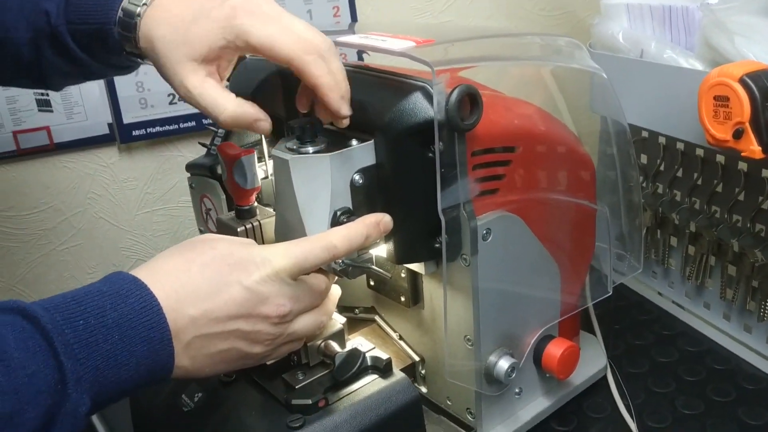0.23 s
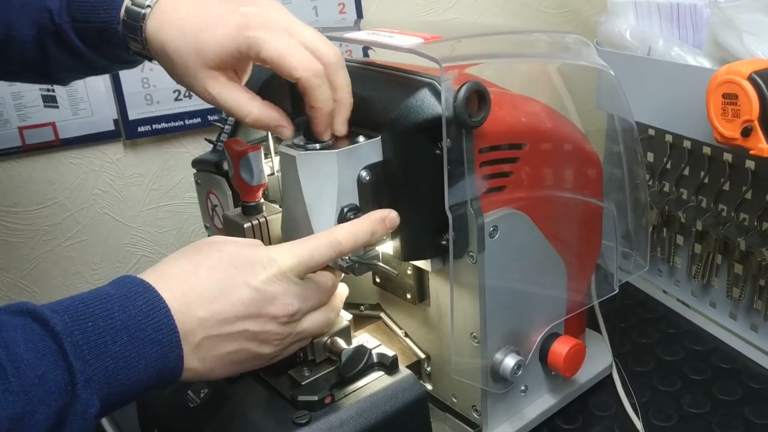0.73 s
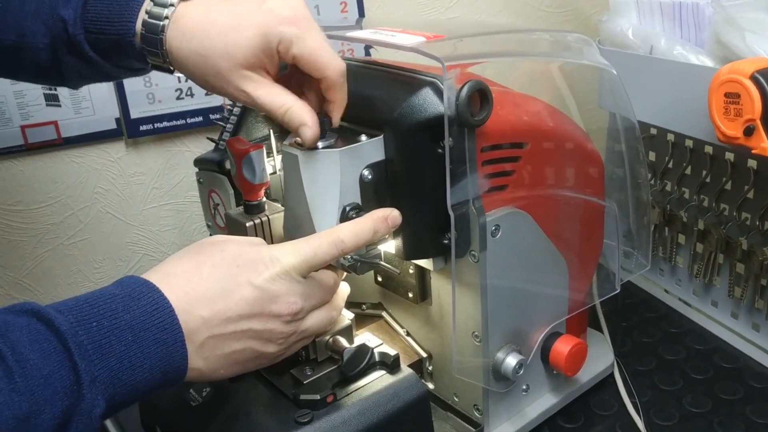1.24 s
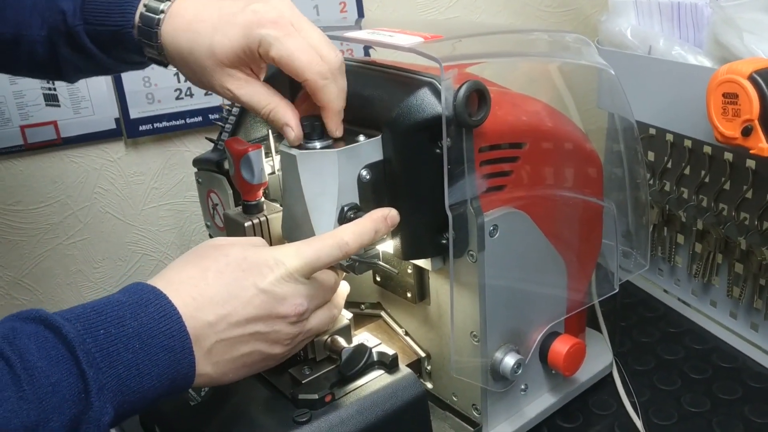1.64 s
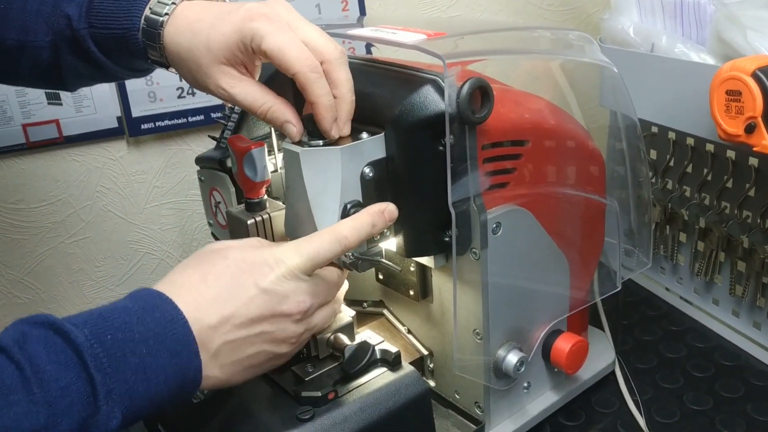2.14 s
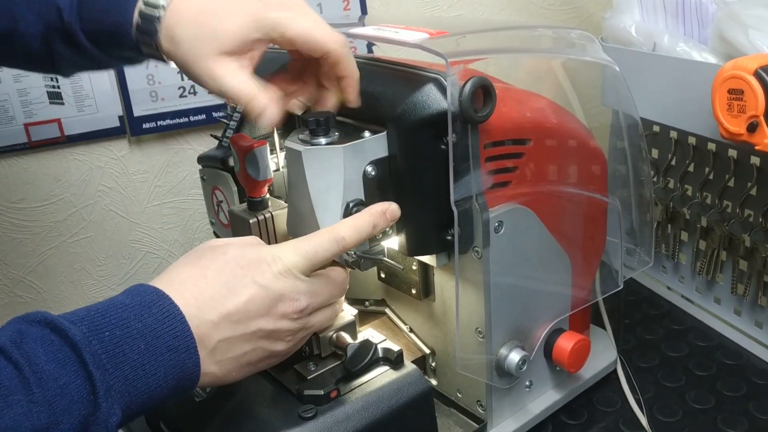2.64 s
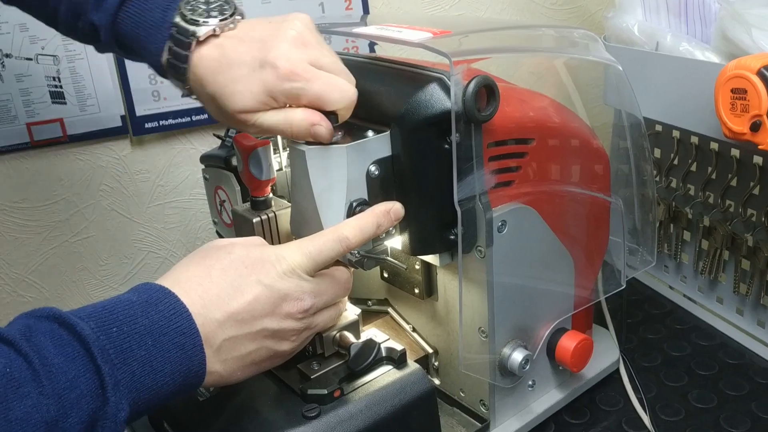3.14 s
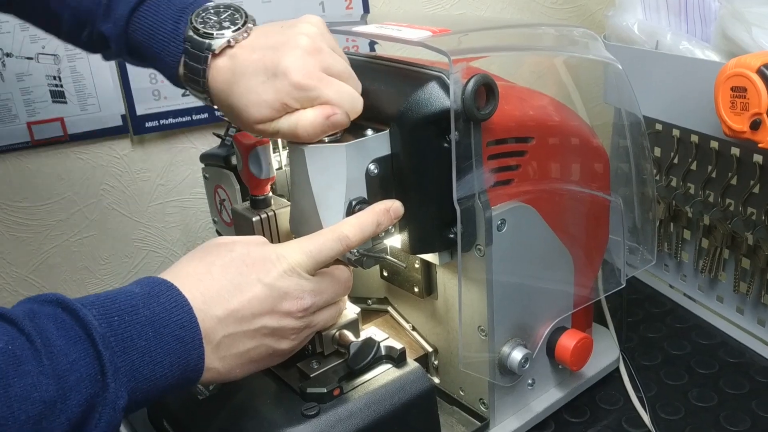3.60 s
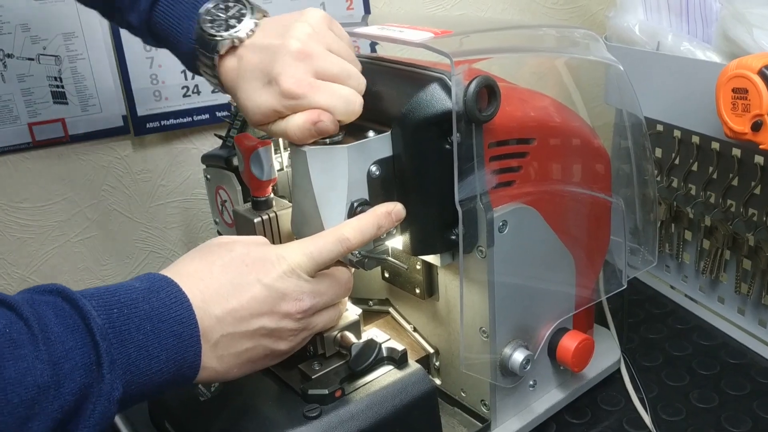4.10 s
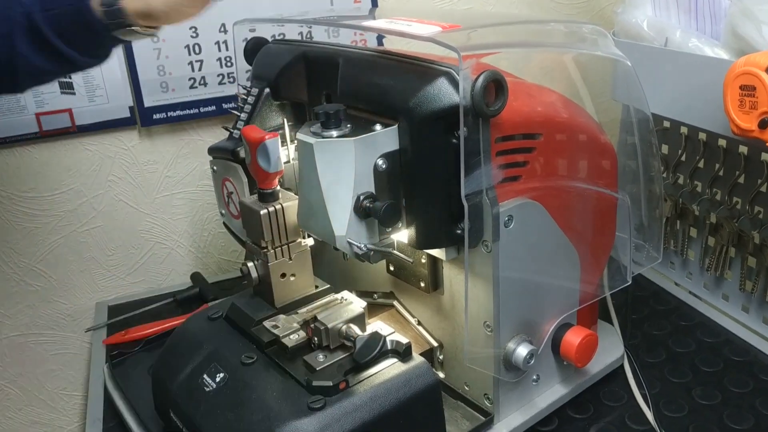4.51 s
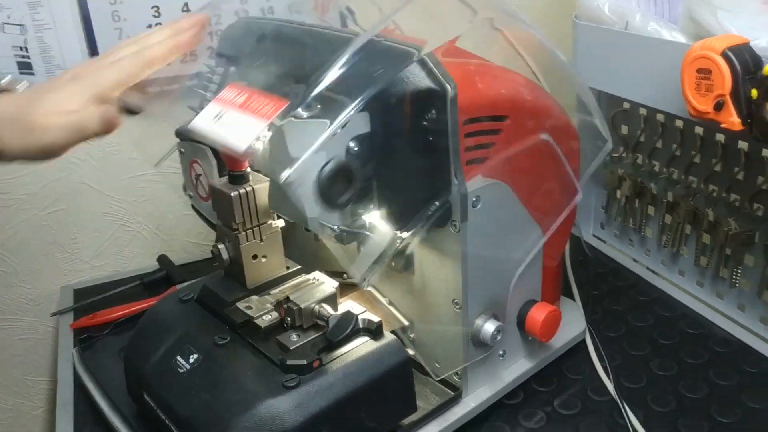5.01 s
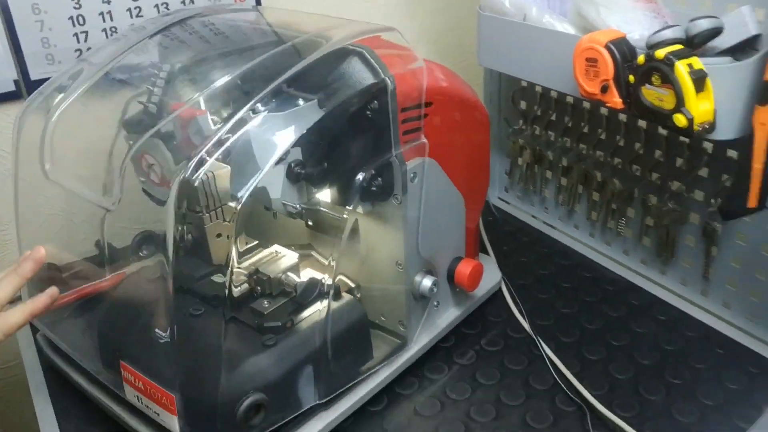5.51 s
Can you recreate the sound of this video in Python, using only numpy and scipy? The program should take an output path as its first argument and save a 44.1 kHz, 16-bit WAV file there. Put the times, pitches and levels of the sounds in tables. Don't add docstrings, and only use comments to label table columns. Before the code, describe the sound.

In a small workshop, a hand clicks and tightens a metal knob above a whistling fan hiss before a plastic cover closes with a loud thud.

```python
import sys
import numpy as np
from scipy import signal
from scipy.fft import rfft, irfft, next_fast_len
from scipy.io import wavfile

SR = 44100
rng = np.random.default_rng(int(sys.argv[2]) if len(sys.argv) > 2 else 0)


def volts_from_decibels(level):
    exponent = np.asarray(level, float) / 20
    return 10 ** exponent


def dump_mix(stems):
    frames = np.atleast_2d(stems).T
    limited = np.clip(frames, -1, 1)
    pcm = np.round(limited * 32767).astype(np.int16)
    wavfile.write(sys.argv[1], SR, pcm)


N = 253575


def at_hz(points, hz):
    table = np.array(points)
    return np.interp(np.log(hz), np.log(table[:, 0]), table[:, 1])


def over_time(points):
    return np.interp(np.arange(N) / SR, *np.transpose(points))


def rms_one(x):
    return x / np.sqrt(np.mean(x ** 2) + 1e-20)


def energy_one(pieces):
    return [p / np.sqrt(np.sum(p ** 2) + 1e-20) for p in pieces]


def butterworth(x, order, hz, kind):
    return signal.sosfilt(signal.butter(order, hz, kind, fs=SR, output="sos"), x)


def add(track, s, piece):
    i = int(s * SR)
    track[i:i + len(piece)] += piece[:N - i]


def add_all(times, gains, pieces):
    track = np.zeros(N)
    for s, gain, piece in zip(times, gains, pieces):
        add(track, s, gain * piece)
    return track


def ring(drive, hz, t60):
    r = volts_from_decibels(-60 / (t60 * SR))
    w = 2 * np.pi * hz / SR
    return signal.lfilter([0, np.sin(w)], [1, -2 * r * np.cos(w), r * r], drive + 1e-18)


def grit(envelope, per_s):
    size = len(envelope)
    hit = rng.random(size) < per_s / SR
    impacts = hit * rng.standard_normal(size) * rng.exponential(1, size)
    return envelope * (impacts + 0.0064 * rng.standard_normal(size))


def contact_grit(contact, rise, per_s, lead):
    t = np.arange(1500) / SR
    decays = np.clip(contact, .0005, .012)
    chatter = energy_one([grit((1 - np.exp(-t / (rise * c))) * np.exp(-t / c), per_s) for c in decays])
    touches = [lead * (np.arange(len(t)) == int(rise * c * SR)) for c in decays]
    return energy_one([p + touch for p, touch in zip(chatter, touches)])


def strike(modes, times, levels_db, centres_hz, drives, focus_db, scatter_db, tilt_db=0):
    out = np.zeros(N)
    luck = rng.standard_normal((len(times), len(modes)))
    for k, (hz, mode_db, t60) in enumerate(modes):
        away = np.log2(hz / centres_hz)
        focus = -focus_db * np.minimum(abs(away), 2.2)
        db = levels_db + mode_db + focus + tilt_db * away + scatter_db * luck[:, k]
        out += ring(add_all(times, np.sign(luck[:, k]) * volts_from_decibels(db), drives), hz, t60)
    return out


def drift(rate):
    knots = rng.standard_normal(600)
    return np.interp(np.arange(N) * rate / SR, np.arange(600), knots)


# f/Hz, correlation/1
LIKENESS = [(60, 0.083), (150, 0.96), (380, 0.81), (950, 0.29), (2380, 0.11), (5980, -0.071), (15000, -1.6)]


def air_noise(gain_at, flicker_db):
    hz = np.fft.rfftfreq(N, 1 / SR) + 1
    alike = np.clip(at_hz(LIKENESS, hz), 0, 1)
    mid, side = rfft(rng.standard_normal((2, N)))
    pair = np.sqrt(1 + alike) * mid + np.sqrt(1 - alike) * side * [[1], [-1]]
    return rms_one(irfft(pair * gain_at(hz), N)) * volts_from_decibels(flicker_db * drift(14))


# f/Hz, width/Hz, level/dB
WHISTLES = [(4380, 55, -8.5), (5800, 160, -13.5), (6355, 73, -10.5), (6790, 230, -13), (7163, 414, -4.5),
            (7414, 103, -3), (7870, 300, -14), (8432, 152, -7.5)]
# f/Hz, level per Hz/dB
MURMUR = [(350, -52), (600, -6.5), (778, -0.5), (1060, -5), (1240, -3), (1630, -5), (1850, -1),
          (2300, -2.5), (4320, -8.5), (5270, -11.5), (6500, -11), (8450, -32), (14300, -120)]
# f/Hz, level per Hz/dB
HISS = [(5180, -11.5), (8800, -3), (9210, -13), (9620, -13.5), (10300, -2), (11400, -5.5), (13500, 2),
        (14900, -2), (15600, 7)]
# f/Hz, level per Hz/dB
HUM = [(15, -88), (25, -53), (53, -25), (122, -27.5), (189, -1.5), (222, -2.5), (269, -13), (299, -9),
       (372, -10), (404, -14.5), (462, -15.5), (529, -6), (640, -34), (830, -60), (1410, -120)]
# t/s, level/dB
STIR = [(0, -59.5), (0.64, -56.5), (0.86, -54.5), (1.12, -55.5), (1.26, -52.5), (1.52, -59.5), (2.1, -61),
        (2.35, -60), (2.66, -59.5), (3.19, -58), (3.36, -53.5), (3.6, -60.5), (4.1, -56.5), (5.01, -58.5),
        (5.3, -54), (5.56, -50), (5.75, -47.5)]
# t/s, speed/1
SWEEP = [
    (5.05, 0.02),
    (5.3, 0.3),
    (5.44, .4),
    (5.56, 1.1),
    (5.75, 0.5),
]
FAN_DB, HISS_DB, HUM_DB, GRILLE_DB = -50.5, -54, -54.5, -69.5
SWEEP_HISS_DB, SWEEP_FAN_DB = 6.5, -4.5
HUM_FOLLOWS = 0.56
HISS_TOP_HZ = 15760
GRILLE_HZ, GRILLE_WIDTH_HZ = 1870, 80


def background():
    stir_db, sweep = over_time(STIR), over_time(SWEEP)

    def whistle_gain(hz):
        return sum(volts_from_decibels(db) / (1 + (2 * (hz - f) / width) ** 2) ** 1.39 for f, width, db in WHISTLES)

    fan = air_noise(whistle_gain, flicker_db=0.1)
    murmur = air_noise(lambda hz: volts_from_decibels(at_hz(MURMUR, hz)), flicker_db=3.0)
    grille = air_noise(lambda hz: 1 / (1 + (2 * (hz - GRILLE_HZ) / GRILLE_WIDTH_HZ) ** 2), flicker_db=0.0)
    hiss = air_noise(lambda hz: volts_from_decibels(at_hz(HISS, hz)) * (hz < HISS_TOP_HZ), flicker_db=0.66)
    hum = air_noise(lambda hz: volts_from_decibels(at_hz(HUM, hz)), flicker_db=3.0)
    fan *= volts_from_decibels(FAN_DB + SWEEP_FAN_DB * sweep)
    murmur *= volts_from_decibels(stir_db + 1.0)
    grille *= volts_from_decibels(GRILLE_DB)
    hiss *= volts_from_decibels(HISS_DB + SWEEP_HISS_DB * sweep)
    hum *= volts_from_decibels(HUM_DB + HUM_FOLLOWS * (stir_db - stir_db.mean()))
    return fan + murmur + grille + hiss + hum


# f/Hz, level/dB, t60/s
SEATED = [(790, -23, 0.037), (1124, -29, 0.07), (1190, -16, 0.097), (1325, -21, 0.09), (1600, -19, 0.03),
          (1974, -9.5, 0.053), (2090, -24, 0.04), (2366, -15.5, 0.059), (2470, -7, 0.069),
          (2593, -13, 0.071), (2700, -18, 0.08), (2770, -19.5, 0.052), (2910, -15, 0.04), (3080, -20, 0.07),
          (3460, -30, 0.036)]
# multiple of the tick's pitch/1, level/dB, t60/s
COVER_RING = [(1.0, -4, 0.018), (1.22, -11, 0.013), (1.75, -17, 0.009), (2.6, -26, 0.0061)]


def own_rings(kind, times, levels_db, pitches_hz, drives):
    out = np.zeros(N)
    for k, s, level_db, pitch, drive in zip(kind, times, levels_db, pitches_hz, drives):
        if k == 0:
            continue
        modes = SEATED if k == 1 else [(pitch * ratio, db, t60) for ratio, db, t60 in COVER_RING]
        padded = np.pad(drive, (0, 6000))
        for j, (hz, db, t60) in enumerate(modes):
            add(out, s, (-1) ** j * volts_from_decibels(level_db + db) * ring(padded, hz, t60))
    return out


# t/s, peak level/dB, strongest f/Hz, brightness/(dB per octave)
TICKS = [(0.014, -39, 1890, 1), (0.11, -22, 1690, -4), (0.221, -27.5, 1690, -2), (0.4525, -25, 2460, -3.5),
         (0.474, -21.5, 2050, -1.5), (0.527, -27.5, 2110, 8), (0.729, -30, 1890, -1),
         (0.8305, -28.5, 1930, 0.5), (1.043, -16, 2450, -1.5), (1.0787, -17, 2450, -2),
         (1.316, -19, 2490, 1), (1.357, -18, 2040, -3), (2.085, -28.5, 1900, -7.5),
         (2.11, -28.5, 1580, -15.5), (2.184, -25.5, 1870, -9), (2.557, -25, 1690, -4),
         (3.2597, -13, 2600, -4.5), (3.415, -28.5, 2700, -1.5), (3.491, -46, 1950, -15),
         (3.81, -40.5, 1670, -9), (4.305, -36, 1920, -10.5), (4.343, -27.5, 1480, 3)]
# t/s, peak level/dB, strongest f/Hz, brightness/(dB per octave)
SEATING = [
    (3.2605, -7, 2510, -4.5),
]
# t/s, peak level/dB, strongest f/Hz, brightness/(dB per octave)
COVER_TICKS = [
    (5.367, -26.5, 1290, 14),
    (5.4188, -23.5, 2140, -4),
    (5.7138, -19, 1340, 2),
    (5.7244, -18.5, 1490, 8),
    (5.737, -14, 2150, -5),
]
# f/Hz, level/dB, t60/s
BODY = [(658, -45, 0.02), (846, -21, 0.15), (990, -12, 0.045), (1207, -3.5, 0.06), (1315, -22, 0.11),
        (1533, -1, 0.032), (1690, 6, 0.017), (1926, 7.5, 0.02), (2110, -4.5, 0.034), (2450, 8, 0.02),
        (2570, -35, .045), (2680, 8, 0.0067), (2930, 6, 0.027), (3430, 1, 0.025), (3280, 4.5, 0.018)]
# f/Hz, level/dB, t60/s
PANELS = [(hz, -2.5 - 1.5 * max(np.log2(hz / 3100), 0), 27.0 / hz ** 0.89) for hz in np.geomspace(640, 5200, 26)]
# f/Hz, level/dB, t60/s
HOUSING = [(529, 3, 0.14), (503, 6.5, 0.017), (600, -12, 0.1)]
LOOSE_CONTACT_S, SNUG_CONTACT_S, SNUG_FROM_S = 0.0045, 0.0033, .8
SEATING_CONTACT_S, COVER_CONTACT_S = 0.00496, 0.0012
KNOB_HOLLOW_DB, HOLLOW_FOLLOWS = -55, 0.45
SEATING_HOLLOW_DB, COVER_HOLLOW_DB = -23, -32
SEATING_BODY_DB, COVER_BODY_DB = -12, -13
BARE_DB, BARE_BAND_HZ = -12, [2600, 4500]


def ticks():
    s, db, hz, tilt_db = np.transpose(TICKS + SEATING + COVER_TICKS)
    kind = np.repeat(range(3), [len(TICKS), len(SEATING), len(COVER_TICKS)])
    knob_contact = np.where(s < SNUG_FROM_S, LOOSE_CONTACT_S, SNUG_CONTACT_S)
    contact = np.choose(kind, [knob_contact, SEATING_CONTACT_S, COVER_CONTACT_S])
    knob_hollow_db = KNOB_HOLLOW_DB + HOLLOW_FOLLOWS * (db + 18)
    hollow_db = np.choose(kind, [knob_hollow_db, db + SEATING_HOLLOW_DB, db + COVER_HOLLOW_DB])
    body_db = db - 12.5 + np.choose(kind, [0, SEATING_BODY_DB, COVER_BODY_DB])

    drives = contact_grit(contact, rise=0.14, per_s=9000, lead=0.34)
    s = s - 0.2884 * contact
    bare = add_all(s, volts_from_decibels(db + BARE_DB + tilt_db * 0.4), drives)
    body = own_rings(kind, s, db, hz, drives) + butterworth(bare + 1e-18, 2, BARE_BAND_HZ, "band")
    body += strike(BODY + PANELS, s, body_db, hz, drives, focus_db=9.0, scatter_db=1.6, tilt_db=tilt_db)
    body = butterworth(body, 2, 480, "high")
    return body + strike(HOUSING, s, hollow_db, hz, drives, focus_db=-1.5, scatter_db=3.5)


# t/s, peak level/dB, strongest f/Hz, length/s
RUBS = [(0.096, -30, 1670, 0.023), (0.431, -34.5, 2100, 0.022), (0.516, -31.5, 2100, 0.027),
        (0.588, -32.5, 2450, 0.033), (0.629, -33.5, 1480, 0.021), (0.7, -37, 1950, 0.026),
        (0.766, -38, 794, 0.035), (0.923, -29.5, 1050, 0.028), (0.954, -30.5, 1120, 0.0093),
        (1.183, -31.5, 2440, 0.029), (1.209, -24.5, 1020, 0.049), (1.387, -36, 2050, 0.069),
        (1.494, -40.5, 1490, 0.03), (1.786, -41.5, 2470, 0.03), (1.834, -33.5, 1130, 0.021),
        (2.102, -26, 710, 0.031), (2.377, -36, 870, 0.029), (2.573, -32, 740, 0.033),
        (2.625, -39.5, 764, 0.019), (2.786, -39.5, 2660, 0.046), (2.861, -33, 940, 0.066),
        (2.886, -28, 625, 0.026), (3.224, -42, 2450, 0.014), (3.423, -32.5, 2110, 0.041),
        (3.463, -51, 662, 0.033), (4.015, -44, 2600, 0.022), (4.171, -38.5, 767, 0.02),
        (4.198, -34.5, 2570, 0.04), (4.232, -37, 2450, 0.036), (4.889, -38.5, 600, 0.038)]
# t/s, peak level/dB, strongest f/Hz, length/s
COVER_RUBS = [
    (5.261, -36.5, 2190, 0.035),
    (5.285, -35, 1140, 0.07),
    (5.342, -35, 650, 0.043),
    (5.424, -35.5, 2070, 0.05),
    (5.54, -32, 1500, 0.023),
    (5.582, -45, 1230, 0.02),
    (5.664, -27, 2730, 0.022),
    (5.678, -24, 1500, 0.066),
]
SWISH_DB, SWISH_FOLLOWS = -59, 0.32
SWISH_RISE_DB_PER_S, COVER_FROM_S = 20, 5.08


def rubs():
    s, db, hz, length = np.transpose(RUBS + COVER_RUBS)
    nearing_db = SWISH_RISE_DB_PER_S * np.maximum(s - COVER_FROM_S, 0)
    swish_db = SWISH_DB + SWISH_FOLLOWS * (db + 38) + nearing_db
    t = np.arange(6000) / SR
    shapes = [(t / c * np.exp(1 - t / c)) ** 2 for c in np.clip(length, .01, .09) / 2]
    drives = energy_one([grit(shape, 8000) for shape in shapes])
    start = s - .006
    dry_skin = butterworth(rng.standard_normal(N), 2, [7000, 15700], "band")
    swish = add_all(start, volts_from_decibels(swish_db), shapes) * dry_skin
    return swish + strike(BODY + PANELS + HOUSING, start, db - 13.0, hz, drives, focus_db=6.0, scatter_db=3.5)


# t/s, peak level/dB, brightness/(dB per octave), narrowness/(dB per octave)
CRACKS = [(0.107, -34, 3, 12), (0.452, -38, -4, -3), (0.4727, -37.5, 1, -11), (0.529, -44, -1, -3),
          (0.7265, -42, -11, 2), (1.042, -25, 8, 7), (1.079, -30, 4.5, -10), (1.3113, -32.5, 1, -1.5),
          (1.3538, -28, 7, 4), (2.0845, -31, -6, 3.5), (2.1821, -19.5, -1, 11.5), (2.5532, -28.5, 8.5, 6),
          (2.8884, -70, -12, -3), (3.258, -17, 1, 14), (3.2633, -26, 7, 3), (3.419, -38, -9, -3),
          (3.4915, -35, 6, 7), (4.34, -29.5, 4.5, 10.5), (5.3664, -38, 2, 20), (5.419, -34, 6, 9),
          (5.7127, -54, 2, 5), (5.725, -36, 10, 1.5)]
# f/Hz, level/dB, t60/s
STEEL = [(3720, 8, 0.0071), (4170, 3, 0.0089), (4830, -2, 0.019), (5310, 10, 0.0062), (5910, 7, 0.0058),
         (6700, -1, 0.01), (7380, 0.5, 0.0051), (8450, -8.5, 0.0052), (9310, -13, 0.005),
         (10970, -5, 0.0071), (11940, 4.5, 0.0064), (12260, -13, 0.0088), (13500, -6, .007),
         (14700, -27, 0.0053), (15200, -4, .006), (16300, -14, .006)]
CRACK_CONTACT_S = 0.0025
SNAP_DB, SNAP_FROM_HZ = 11, 2200


def cracks():
    s, db, tilt_db, narrow_db = np.transpose(CRACKS)
    drives = contact_grit(np.full(len(s), CRACK_CONTACT_S), rise=0.076, per_s=30000, lead=0.42)
    start = s + .0002
    snap_gain = volts_from_decibels(db + SNAP_DB - np.maximum(narrow_db, 0) * 0.23)
    snap = add_all(start, snap_gain, [drive / abs(drive).max() for drive in drives])
    snap = butterworth(snap, 2, SNAP_FROM_HZ, "high")
    return snap + strike(STEEL, start, db - 6.0, 6950.0, drives, focus_db=narrow_db, scatter_db=2.0, tilt_db=tilt_db)


# t/s, peak level/dB, f/Hz, t60/s
THUDS = [(0.457, -43.5, 265, 0.11), (0.63, -37, 271, 0.041), (0.73, -42, 247, 0.072),
         (1.087, -39, 262, 0.076), (1.216, -42.5, 338, 0.15), (1.322, -31.5, 252, 0.074),
         (2.111, -48.5, 245, 0.15), (2.192, -43, 237, 0.07), (2.379, -43.5, 339, 0.14),
         (2.564, -34, 291, 0.064), (2.768, -45.5, 202, 0.1), (2.9, -38, 224, 0.097),
         (3.233, -42.5, 258, 0.2), (3.261, -36.5, 288, 0.13), (3.697, -42, 272, 0.071),
         (3.835, -38.5, 270, 0.062), (3.914, -33, 258.5, 0.07), (4.007, -37, 254, 0.06),
         (4.151, -33, 247.5, 0.094), (4.299, -41, 218, 0.13), (4.347, -35.5, 262, 0.1),
         (4.67, -38, 255, 0.18), (4.792, -42.5, 236, 0.083), (4.867, -40.5, 259, 0.1),
         (4.922, -43, 262, 0.078)]
# t/s, peak level/dB, f/Hz, t60/s
COVER_THUDS = [(5.281, -41.5, 199, 0.13), (5.3427, -23, 300, 0.05), (5.3609, -15.5, 229, 0.11),
               (5.3618, -18, 321, 0.044), (5.418, -33.5, 234, 0.14), (5.49, -41.5, 241, 0.1),
               (5.549, -46, 300, 0.35), (5.656, -48, 224, 0.12), (5.702, -22, 218, 0.083),
               (5.724, 1.5, 249, 0.057), (5.7384, -8, 258, 0.064)]
PUSH_PER_T60, BENCH_PUSH_PER_T60 = 0.018, 0.1082
UPPER_SHARE, SHUT_UPPER_SHARE, SHUT_FROM_S = 0.25, 0.46, 5.68


def thuds():
    out, t = np.zeros(N), np.arange(9000) / SR
    for s, db, hz, t60 in THUDS + COVER_THUDS:
        push = (PUSH_PER_T60 if s > COVER_FROM_S else BENCH_PUSH_PER_T60) * t60
        upper = SHUT_UPPER_SHARE if s > SHUT_FROM_S else UPPER_SHARE
        fade = volts_from_decibels(-60 * t / np.clip(t60, .02, .3))
        shape = (1 - np.exp(-t / np.clip(push, .001, .03))) * fade
        phase = 2 * np.pi * hz * t
        overtones = 0.48 * np.sqrt(fade) * np.sin(1.8 * phase) + fade * np.sin(2.046 * phase)
        start = s + .001 - .6 * push * (s < COVER_FROM_S)
        add(out, start, volts_from_decibels(db - 2.0) * shape / shape.max() * (np.sin(phase) + upper * overtones))
    return out


ROOM_T60_S, ROOM_DB = 0.18, -13


def room(x):
    t = np.arange(16000) / SR
    tail = rng.standard_normal((2, len(t))) * volts_from_decibels(-60 * t / ROOM_T60_S) * (1 - np.exp(-t / 0.00031))
    tail = butterworth(tail, 1, [350, 3500], "band")
    tail /= np.sqrt(np.sum(tail ** 2, axis=1, keepdims=True))
    return volts_from_decibels(ROOM_DB) * signal.fftconvolve(x[None], tail, axes=1)[:, :N]


# t/s, shift to the right/dB
COVER_SHIFT = [
    (5.05, 0),
    (5.3, .8),
    (5.75, .8),
]


def scene():
    hits = butterworth(ticks() + cracks() + rubs() + thuds(), 6, 180, "high")
    shift_db = over_time(COVER_SHIFT)
    return hits * volts_from_decibels(shift_db * [[-.5], [.5]]) + room(hits) + background()


# f/Hz, left minus right level/dB
LEAN = [(60, -2), (150, 1), (300, 1.5), (640, 4), (1400, 6.5), (2500, 4.5), (4500, 3), (8000, 7),
        (14000, 10.5)]
LEFT_LAG_S = 0.0001


def microphones(dry):
    size = next_fast_len(N + 4096)
    hz = np.fft.rfftfreq(size, 1 / SR) + 1
    half = volts_from_decibels(at_hz(LEAN, hz) / 2) * np.exp(-1j * np.pi * hz * LEFT_LAG_S)
    return irfft(rfft(dry, size) * [half, 1 / half], size)[:, :N]


def low_pass(x):
    return signal.sosfilt(signal.butter(12, 16800, fs=SR, output="sos"), x)


def record(dry):
    x = microphones(dry)
    x = .72 * np.tanh(x / .72)
    x = butterworth(x, 2, 100, "high")
    x = signal.sosfilt(signal.cheby2(10, 60, 16750, fs=SR, output="sos"), x)
    return low_pass(x)


dry = scene()
out = record(dry)
dump_mix(out)
```